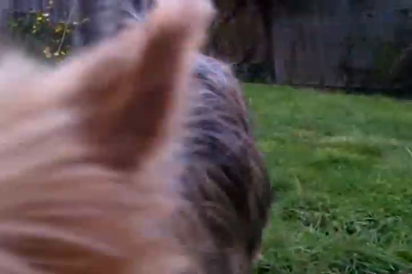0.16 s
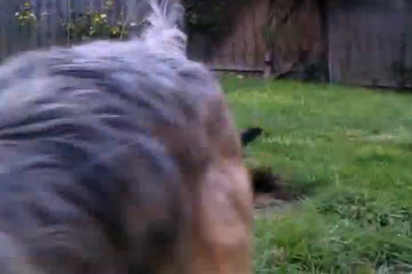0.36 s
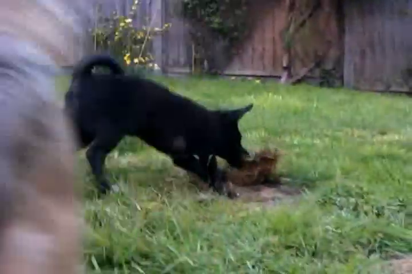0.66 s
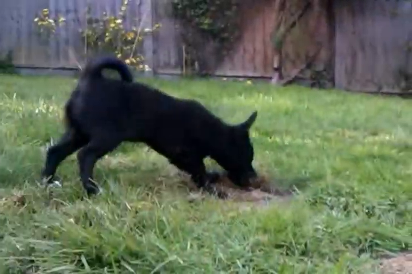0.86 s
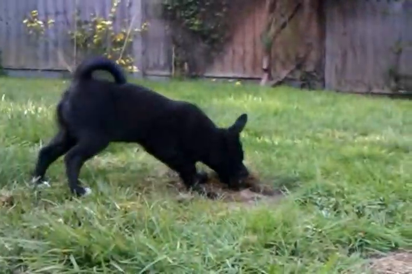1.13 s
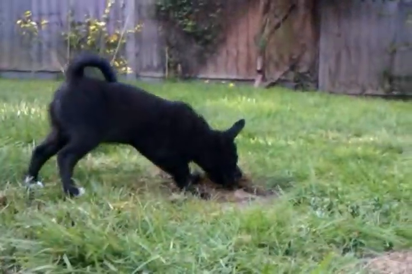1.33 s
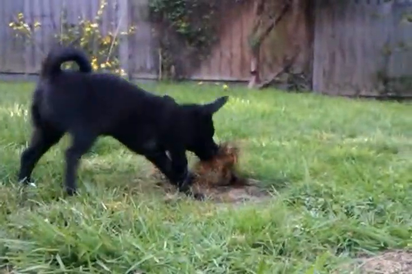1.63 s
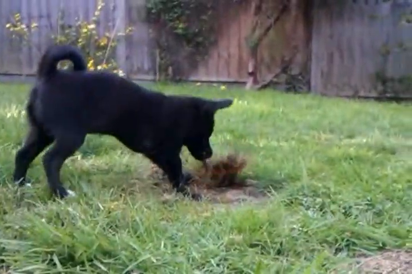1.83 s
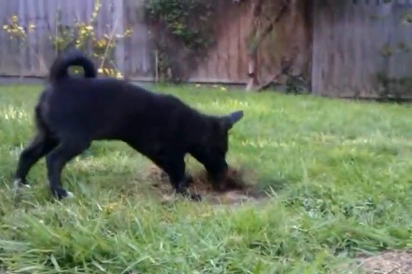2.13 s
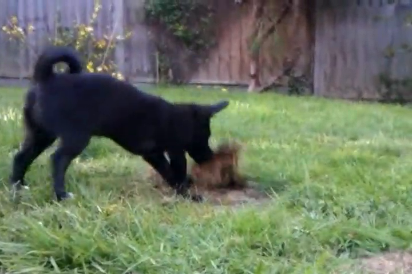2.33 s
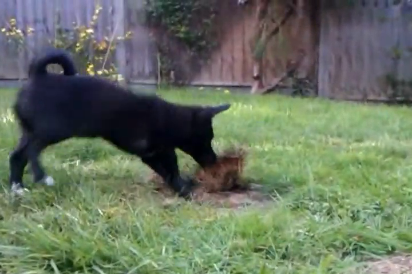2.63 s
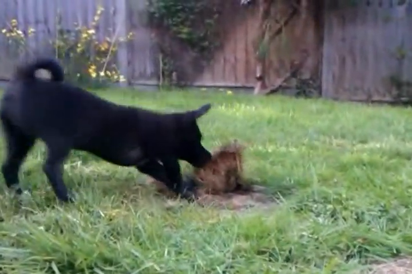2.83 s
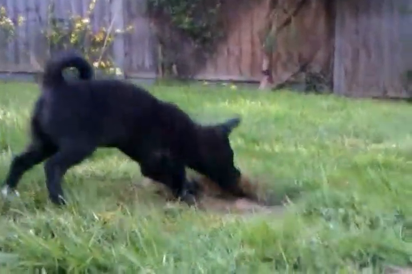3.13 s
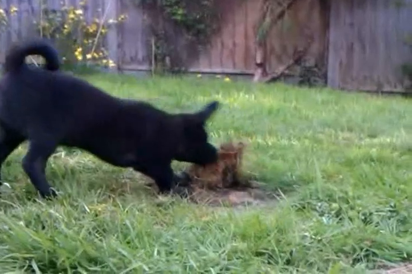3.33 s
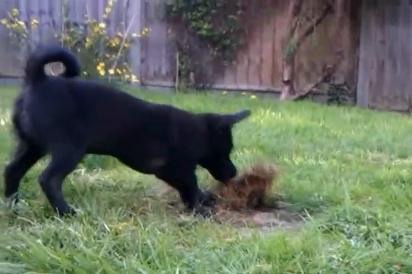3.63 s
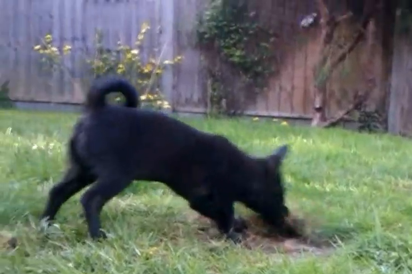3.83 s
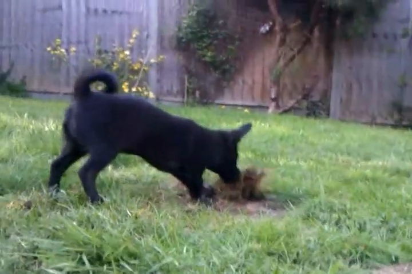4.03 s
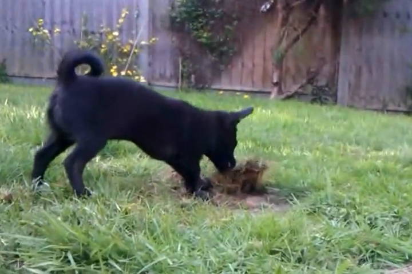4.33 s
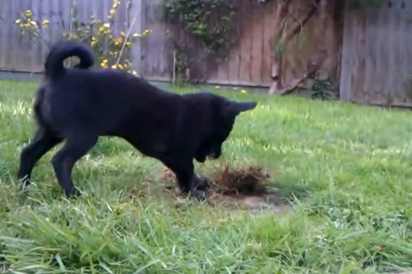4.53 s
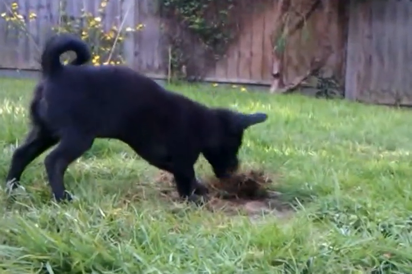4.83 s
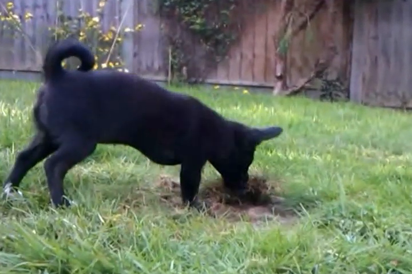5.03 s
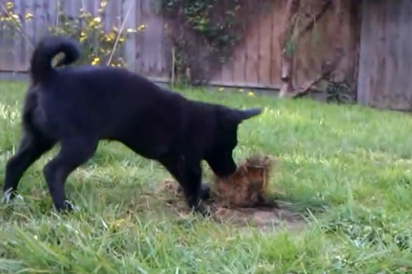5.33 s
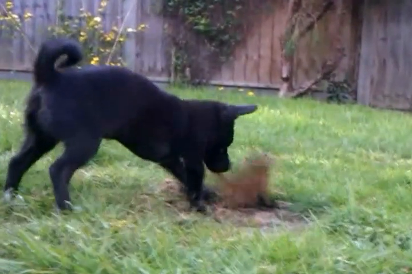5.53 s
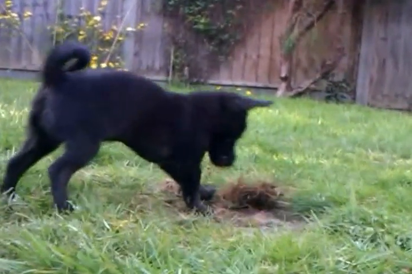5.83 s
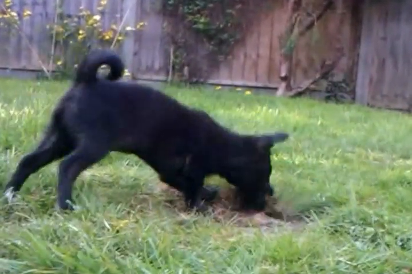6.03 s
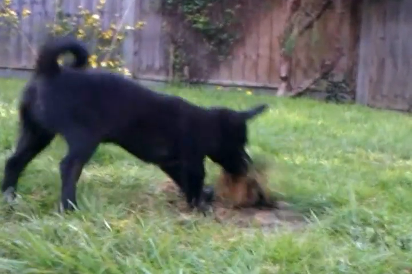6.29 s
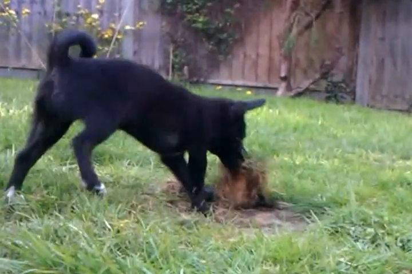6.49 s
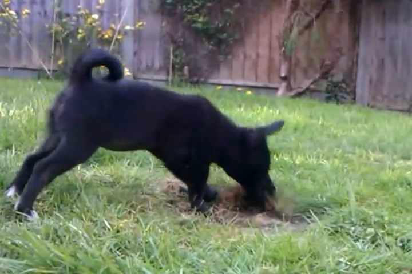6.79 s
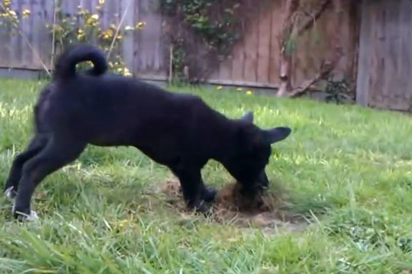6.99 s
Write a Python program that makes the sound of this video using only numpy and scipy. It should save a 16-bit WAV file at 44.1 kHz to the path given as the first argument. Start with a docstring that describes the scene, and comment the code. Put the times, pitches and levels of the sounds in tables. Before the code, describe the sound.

A quiet garden is heard through a hand-held camera, with a steady soft hush and hiss and one very faint bird whistle at the start. From about 0.4 seconds, fingers shift on the plastic body right at the microphone, making creaky rubs, dry ticks and dull knocks over a low swaying rumble. The handling comes in clusters, around 1.5 seconds and from 2 to 2.8, with the loudest knock just after 3 seconds and more rubs and knocks between 4 and 4.8. It fades to a few small ticks and soft bumps. From about 5 seconds to the end, a puppy digs at turf a metre or two away: quieter, uneven crackling of soil, dotted with short crunches of snapping roots. A few thin, distant bird whistles come faintly between 6.5 and 7 seconds.

```python
"""A quiet garden, where a puppy tugs and scratches at a clod of turf a metre or two from a hand-held camera.
Fingers shift on the plastic housing right at the microphone: skin sticks and slips in creaky rubs, the
shell rings with ticks and knocks, and the hand adds low sway and bumps. Later, soil and roots crackle and
crunch under paws and snout. Faint far birds, outdoor hush and microphone hiss lie underneath."""
import sys
import numpy as np
from scipy import signal
from scipy.fft import rfft, irfft, next_fast_len
from scipy.io import wavfile
from scipy.ndimage import uniform_filter1d

SR = 44100
rng = np.random.default_rng(int(sys.argv[2]) if len(sys.argv) > 2 else 0)


def to_wav(sig):
    """Store sig (one row per channel, or 1-D mono) as 16-bit WAV at the path in sys.argv[1].

    Samples outside -1..1 are clipped; the rate is SR.
    """
    pcm = np.clip(np.atleast_2d(sig), -1, 1) * 32767
    pcm = np.round(pcm).astype(np.int16)
    wavfile.write(sys.argv[1], SR, pcm.T)  # frames by channels


N = 315579
T = np.arange(N) / SR
# fingers sliding on the housing: t/s, length/s, level/dB, brightness/dB (light skids high, heavy drags low)
SLIDES = [(0, 0.072, -60.5, 2), (.41, 0.15, -55.5, 7.5), (.62, 0.23, -53.5, -3), (.76, .75, -63, 9),
          (1.219, 0.051, -41.5, -2), (1.42, 0.041, -48, 12.5), (1.49, .13, -41, -9.5),
          (1.72, 0.033, -53.5, 3), (1.8, 0.16, -52, -12), (2.032, 0.099, -40, -12),
          (2.127, 0.012, -29, -7.5), (2.15, 0.25, -43, -16), (2.301, 0.11, -36.5, -4.5),
          (2.4, 0.07, -38, -3), (2.488, 0.11, -42, 0.5), (2.66, .13, -49.5, 8), (2.841, 0.17, -49.5, 5),
          (3.088, 0.07, -26, -1.5), (3.135, 0.08, -29.5, -8), (3.314, 0.09, -42.5, 9.5),
          (3.42, 0.25, -51.5, -1), (3.68, 0.29, -45.5, -6), (3.88, 0.054, -52.5, 9.5),
          (3.99, 0.12, -49.5, 5.5), (4.179, 0.069, -33.5, -9.5), (4.3, 0.091, -43, -22),
          (4.39, 0.14, -49.5, 2), (4.47, 0.1, -40.5, -14.5), (4.589, 0.084, -44, 0.5)]


def undb(db):
    """Decibels to gain."""
    return 10 ** (np.asarray(db) / 20)


def unit(x):
    """Scale to rms 1."""
    return x / np.sqrt(np.mean(x ** 2))


def resonate(x, peaks, order=2):
    """Sum of resonances (f/Hz, width/Hz, level/dB); a higher order has steeper skirts."""
    out = 0
    for hz, width, db in peaks:
        band = signal.butter(order, [hz - width / 2, hz + width / 2], "bandpass", fs=SR, output="sos")
        out = out + undb(db) * signal.sosfilt(band, x)
    return out


def grains(per_s, spread_db):
    """Random impulses: many small, few large."""
    size = undb(spread_db * np.minimum(rng.exponential(size=N), 4))
    return (rng.random(N) < per_s / SR) * size * rng.choice([-1, 1], N)


def walk(rate_hz):
    """Smooth random drift with rms near 1."""
    hold = int(SR / rate_hz)
    steps = np.repeat(rng.standard_normal(N // hold + 1), hold)
    return unit(uniform_filter1d(uniform_filter1d(steps, hold), hold)[:N])


def add(out, s, sound):
    """Mix a sound in at s seconds."""
    i = int(s * SR)
    out[i:i + len(sound)] += sound[:N - i]


def strokes(rows, edge_s):
    """Gain that swells, holds and fades for each row (t/s, length/s, level/dB); powers add."""
    power = np.zeros(N)
    for s, length, db, *_ in rows:
        t = T[:int((length + edge_s) * SR)]
        edge = min(edge_s, length / 2)
        shape = np.clip(np.minimum(t, t[::-1]) / (2 * edge), 0, 1) ** 2
        add(power, max(s - edge_s / 2, 0), shape * undb(db) ** 2)
    return np.sqrt(power)


def hush(level_db=-54):
    """A slightly unsteady bed of outdoor hush and microphone hiss."""
    # colour of the bed: f/Hz, relative level/dB
    spectrum = [(59, -26), (100, -9.5), (612, -8), (757, -8), (1600, -7.5), (2500, -16), (4170, -15),
                (5990, -20.5), (15300, -26.5), (16300, -34)]
    hz, db = np.transpose(spectrum)
    n = next_fast_len(N)
    bin_hz = np.arange(n // 2 + 1) * SR / n
    colour = undb(np.interp(np.log(bin_hz + 1), np.log(hz), db))
    gain = undb(level_db + 0.12 * walk(3.3))
    return gain * unit(irfft(rfft(rng.standard_normal(n)) * colour, n)[:N])


def sway(jolt_heave_db=-4, jolt_rumble_db=-7.5):
    """The camera sways in the hand: slow pressure on the microphone, jolted by every finger slide."""
    # the hand's unrest: t/s, heave level/dB, rumble level/dB
    unrest = [(0.0, -47, -56), (0.16, -43.5, -58), (.6, -58, -61), (1.08, -55, -59.5), (1.51, -39.5, -53),
              (1.99, -49.5, -50.5), (2.31, -34, -38.5), (2.81, -55, -57), (3.27, -53, -45),
              (3.58, -60, -50), (3.88, -51, -48.5), (4.34, -48, -43), (4.66, -56, -52), (5.06, -51, -57.5),
              (5.42, -55, -54.5), (6.63, -68, -59), (7.15, -79, -56.5)]
    s, heave_db, rumble_db = np.transpose(unrest)
    pressure = rng.standard_normal(N) * undb(2 * walk(12))
    jolt = strokes(SLIDES, edge_s=0.06)
    heave = np.hypot(undb(np.interp(T, s, heave_db)), undb(jolt_heave_db) * jolt)
    rumble = np.hypot(undb(np.interp(T, s, rumble_db)), undb(jolt_rumble_db) * jolt)
    return (heave * unit(resonate(pressure, [(25.4, 19.6, 0)]))
            + rumble * unit(resonate(pressure, [(76, 130, 0)])))


def finger_rub(edge_s=0.027, shared=0.4):
    """Skin sticks and slips on plastic: dense, patchy slips drive the housing's broad resonances."""
    # the housing's resonances in three registers: f/Hz, width/Hz, level/dB
    dull = [(432, 265, 0)]
    middle = [(1170, 500, 2), (1860, 140, -5)]
    bright = [(2650, 1400, 0), (4500, 2000, -7)]
    s, length, db, bright_db = np.transpose(SLIDES)

    def envelope(level_db):
        return strokes(zip(s, length, level_db), edge_s)

    # coarse slips feed all registers; fast, bright skids run smoother
    roughness = envelope(db - 0.5 * np.maximum(bright_db, 0)) / (envelope(db) + 1e-9)
    coarse = roughness * unit(grains(350, spread_db=4.5))
    out = 0
    for peaks, layer_db in (dull, db), (middle, db + bright_db), (bright, db - 7.5 + 0.9 * bright_db):
        slips = (shared * coarse + unit(grains(800, spread_db=3))) * undb(1.8 * walk(60))
        ring = resonate(slips, peaks, order=1)
        band = resonate(ring, [(2800, 5400, 0)], order=6)  # keep 100-5500 Hz
        out = out + envelope(layer_db) * unit(band)
    return out


def birds():
    """Thin gliding whistles that flutter over the distance."""
    # far calls: t/s, length/s, start f/Hz, end f/Hz, level/dB
    whistles = [(.12, .05, 4550, 4750, -61), (6.56, .19, 5150, 5650, -65), (6.87, .09, 3650, 3100, -61),
                (6.88, .11, 4050, 4050, -63)]
    out = np.zeros(N)
    for s, length, start_hz, end_hz, db in whistles:
        hz = np.linspace(start_hz, end_hz, int(length * SR))
        envelope = undb(db + 2.8 * walk(42)[:len(hz)]) * np.hanning(len(hz)) ** .5
        add(out, s, envelope * np.sin(2 * np.pi * np.cumsum(hz) / SR))
    return out


def housing_ring(colour_db, favoured=(), scatter_db=2.5, detune=.04, spread_s=.0004):
    """One hit rings the plastic shell; where it lands sets each mode's share."""
    # modes of the shell: f/Hz, level/dB, t60/s
    modes = [(86, -11.5, 0.019), (196.5, -10, 0.037), (269, -8, 0.03), (501.5, -2, 0.027), (664, 2, 0.011),
             (885, -2, 0.009), (1092, -1, 0.0086), (1713, -3, 0.0067), (2454, -10.5, 0.0095),
             (2800, -0.5, 0.0042), (3940, -1, 0.0061), (4780, 0, 0.0035), (7350, -8.5, 0.0039),
             (11100, -23, 0.0023), (14600, -25, 0.0016)]
    # the five points of colour_db, from body to top: f/Hz
    colour_hz = (200, 550, 1500, 4500, 12000)
    hz, mode_db, t60 = np.transpose(modes)[:, :, None]
    size, tune, late = rng.standard_normal((3, len(modes), 1))
    share_db = np.interp(np.log(hz), np.log(colour_hz), colour_db)
    for favoured_hz in favoured:
        share_db += 12 * np.exp(-(np.log(hz / favoured_hz) / .12) ** 2)
    # each mode starts at its own moment, the heavy low ones last
    t = np.maximum(T[:3000] - spread_s * np.abs(late) - 0.23 / hz, 0)
    ring = np.exp(-np.log(1000) * t / t60) * np.sin(2 * np.pi * hz * (1 + detune * tune) * t)
    ring[hz[:, 0] < 400] *= -1  # low modes swing back against the first snap
    return -np.sum(undb(share_db + mode_db + scatter_db * size) * ring, axis=0)


def ticks(heavy_db=-9.5, thin_hz=330):
    """A finger slips and the housing ticks; all but the heavy ticks are dry and thin."""
    # finger slips: t/s, level/dB, relative body/dB, relative snap/dB, for some a favoured mode f/Hz
    slips = [(0.472, -20, -26, -18.5), (.481, -25, -6.5, -25), (0.679, -23, -5, -13),
             (0.707, -12.5, -14, -19.5), (.741, -15, -60, -21), (1.228, -23, -27, -10),
             (1.246, -13, -24, -20.5), (1.258, -14, -16.5, -5.5), (1.426, -21.5, -24, -6),
             (1.452, -7, -10, -12), (1.458, -19, -5, -32), (1.466, -5, -12, -16.5),
             (1.495, -10.5, -10, -11), (1.522, -10, -31, -15), (1.53, -3, -10, -17),
             (1.549, -9, -18, -18, 1092), (1.574, -15.5, -25, -7.5), (1.583, -23, -7.5, -23),
             (2.042, -13.5, -24, -32), (2.121, -5.5, -13, -21.5), (2.134, -15, -14.5, -15),
             (2.279, -9, -20, -32), (2.292, 2, -15, -21), (2.356, -10, -16, -19), (2.477, -4, -17, -16),
             (2.545, -7.5, -55, -20.5), (2.607, -21, -40, -39), (2.6852, -24, -19, 0.5),
             (2.733, -18.5, -21, -19), (2.749, -26, -20, -3), (2.756, -10, -16, -26, 3940),
             (2.995, -28.5, 4.5, 6), (3.045, -20.5, -10, -6), (3.052, -30, 5.5, 4),
             (3.067, -6.5, -12.5, -10), (3.098, -14, -13, -14), (3.105, -16.5, -14, -9),
             (3.123, 8, -12, -10), (3.206, -22.5, -10, -30), (3.264, -31.5, -30, -4),
             (3.412, -8, -16.5, -10), (3.468, -18.5, -5, -9.5), (3.516, -21.5, -17, -14.5),
             (3.631, -13, -16, -13.5), (3.892, -24.5, -25.5, -7.5), (3.916, -14, -20, -12.5),
             (3.966, -25, 1, -16), (3.979, -15, -14, -11.5), (4.021, -29, 0, -26), (4.05, -22.5, -32, -7),
             (4.091, -17.5, -9, -46), (4.172, -12.5, -4, -8), (4.1738, -2.5, -1, -11),
             (4.23, -10, -24, -17, 1000), (4.282, -13, -2, -15, 3940), (4.345, -10.5, -17, -18),
             (4.399, -16, -16.5, -40), (4.419, -25.5, -12, -26), (4.476, -17, -2.5, -6),
             (4.484, -19, -9, -17), (4.508, 0, -8, -12, 4780), (4.572, -11.5, -13.5, -6),
             (4.597, -29, -32, -5), (4.652, -19.5, -20, -12), (4.659, -21.5, -12.5, -16),
             (4.703, -16.5, -24, -17), (4.7258, -9.6, -17, -8), (4.803, -17, -18, -14),
             (5.274, -50, -20, 16), (5.379, -36, -20, 0), (5.537, -17.5, -22.5, -10),
             (5.627, -17, -40, -24)]
    thin = signal.butter(4, thin_hz, "highpass", fs=SR, output="sos")
    out = np.zeros(N)
    for s, db, body_db, snap_db, *favoured in slips:
        # a slip hardly moves the low modes; harder slips reach further into the treble
        colour_db = [-59, body_db, 0, snap_db, snap_db + 0.97 * db]
        tick = undb(db) * housing_ring(colour_db, favoured)
        add(out, s, tick if db > heavy_db else signal.sosfilt(thin, tick))
    return out


def knocks():
    """The grip lands with weight and knocks the housing's low modes."""
    # landings of the grip: t/s, level/dB
    landings = [(.542, -23), (1.426, -15), (1.442, -6), (1.505, -17), (1.523, -16), (1.53, -6), (1.55, -18),
                (1.573, -12), (2.207, -9), (2.995, -25), (3.104, -4), (3.123, 10.5), (3.153, -6),
                (3.372, 1), (4.09, -7), (4.173, -3), (4.282, -13.5), (4.477, -14), (4.509, -8),
                (6.578, -19), (6.82, -21.5)]
    # a knock's dark colour, from body to top: level/dB
    colour_db = [-4, -22, -18.5, -47, -80]
    out = np.zeros(N)
    for s, db in landings:
        add(out, s, undb(db) * housing_ring(colour_db))
    return out


def bumps():
    """The hand bumps softly against the camera: short swells of low rumble."""
    # soft contacts: t/s, length/s, level/dB, f/Hz
    contacts = [(1.538, 0.052, -41, 80), (3.121, 0.059, -28.5, 109), (4.179, 0.13, -35.5, 59),
                (4.84, .11, -48, 120), (5.278, .13, -42, 69.4), (5.567, 0.057, -49, 160),
                (5.92, 0.051, -48, 111)]
    out = np.zeros(N)
    for s, length, db, hz in contacts:
        n = int(length * SR)
        rumble = resonate(rng.standard_normal(SR // 4), [(hz, hz, 0)])[-n:]
        add(out, s, undb(db) * unit(rumble * np.sqrt(np.hanning(n))))
    return out


def turf_crackle(snaps_per_s=160, jitter=.5, spread_db=4, snap_top_hz=2000):
    """Fibres part in a quick uneven run of snaps; their colour wanders and finer grit patters above."""
    # turf tearing and crumbling: t/s, length/s, level/dB
    tears = [(2.87, 0.09, -39.5), (5.17, 0.084, -52), (5.28, 0.033, -43.5), (5.35, 0.048, -49.5),
             (5.44, 0.068, -47.5), (5.74, 0.11, -53.5), (5.79, 0.11, -42), (6.07, 0.12, -50.5),
             (6.16, 0.21, -53), (6.35, 0.069, -50.5), (6.43, 0.22, -53.5), (6.945, 0.045, -46.5)]
    # colour of the soil: f/Hz, relative level/dB
    soil = [(800, -36), (1250, 6.5), (1700, -2), (2400, 0), (3400, -14), (6000, -2)]
    soil_hz, soil_db = np.transpose(soil)
    gap, size = rng.standard_normal((N // 100, 2)).T
    at = (np.cumsum(np.exp(jitter * gap)) * SR / snaps_per_s).astype(int)
    snaps = np.zeros(N)
    snaps[at[at < N]] = undb(spread_db * size)[at < N]
    out = 0
    for hz in 850 * 2 ** np.arange(0, 3, 1 / 3):  # third-octave bands
        grit = .4 * unit(grains(200, spread_db=3.6))
        drive = ((hz < snap_top_hz) * unit(snaps) + grit) * undb(3.5 * walk(16))
        band_db = np.interp(np.log(hz), np.log(soil_hz), soil_db) - 10 * np.log10(hz)
        out = out + resonate(drive, [(hz, .35 * hz, band_db)])
    return strokes(tears, edge_s=0.01) * unit(out)


def root_crunches(t60=0.0077, width_hz=430, edge_hz=2680):
    """A root snaps: a short noisy ring at its own pitch with a brighter edge."""
    # single breaks of roots and grit: t/s, level/dB, relative edge/dB, f/Hz
    breaks = [(5.0666, -41, 12, 1250), (5.0895, -31.5, -4, 1680), (5.176, -34.5, -29, 1510),
              (5.3997, -33, -20, 1370), (5.446, -40, -24, 1570), (5.4746, -34, -18, 1540),
              (5.673, -36, -15, 1400), (5.878, -27, -19, 1610), (5.9561, -31, 3, 1360),
              (6.009, -37.5, -11, 1230), (6.0922, -20.5, -10, 1175), (6.2057, -33.5, -3.5, 1500),
              (6.3138, -37, -20, 1610), (6.489, -34.5, -10, 1360), (6.595, -42, 8.5, 1660),
              (6.6909, -37, 1.5, 1250), (6.9838, -31, -4.5, 2080), (7.0552, -31, -10, 1290),
              (7.078, -40, 4, 1290), (7.1215, -37, -8, 1070)]
    out, t = np.zeros(N), T[:2500]
    for s, db, edge_db, hz in breaks:
        tune = 1 + 0.07 * rng.standard_normal()
        burst = rng.standard_normal(len(t)) * np.exp(-np.log(1000) * t / t60)
        body = resonate(burst, [(hz, width_hz, 0)])
        edge = resonate(burst, [(edge_hz * tune, 2 * width_hz, 0)])
        add(out, s, undb(db) * (body / np.abs(body).max() + undb(edge_db) * edge / np.abs(edge).max()))
    return out


def digging(echo_db=-9.5, echo_t60=0.04):
    """The puppy's crackle and crunches, smeared by reflections off ground and fence."""
    direct, t = turf_crackle() + root_crunches(), T[:6000]
    echo = unit(rng.standard_normal(len(t)) * np.exp(-np.log(1000) * t / echo_t60)) / np.sqrt(len(t))
    return direct + undb(echo_db) * signal.fftconvolve(direct, echo)[:N]


def scene():
    """Close handling noise over the puppy and the garden, in mono."""
    return (ticks() + knocks() + finger_rub() + digging() + sway() + birds() + hush() + bumps())[None]


def record(dry, top_hz=16300):
    """The loudest hits clip at full scale; a steep low-pass cuts the top."""
    lowpass = signal.ellip(8, .2, 70, top_hz, fs=SR, output="sos")
    return signal.sosfilt(lowpass, np.clip(dry, -1, 1))


dry = scene()
out = record(dry)
to_wav(out)
```